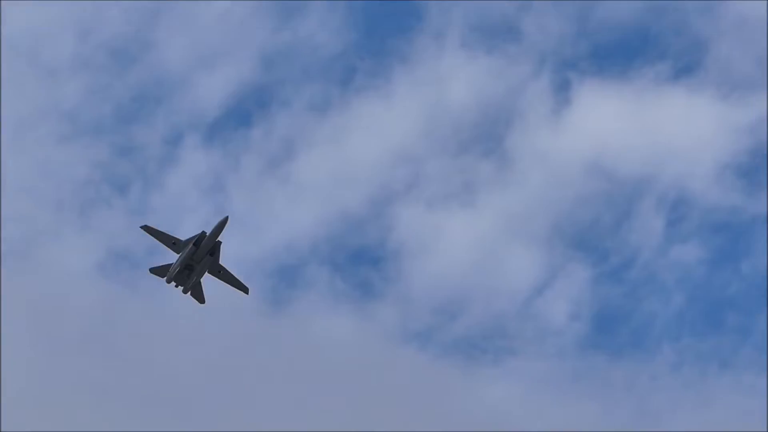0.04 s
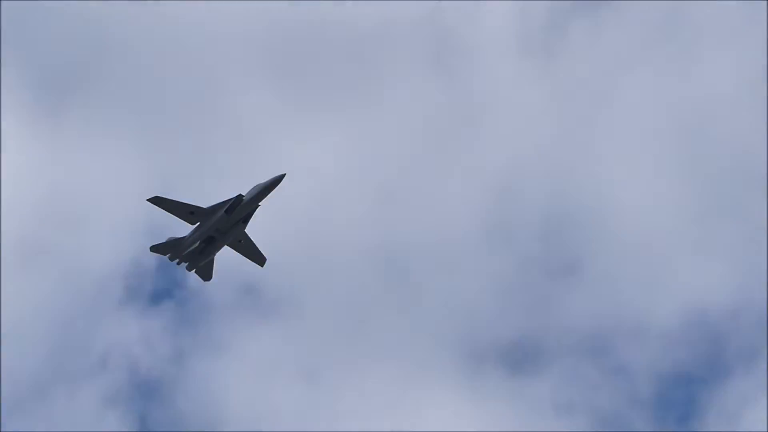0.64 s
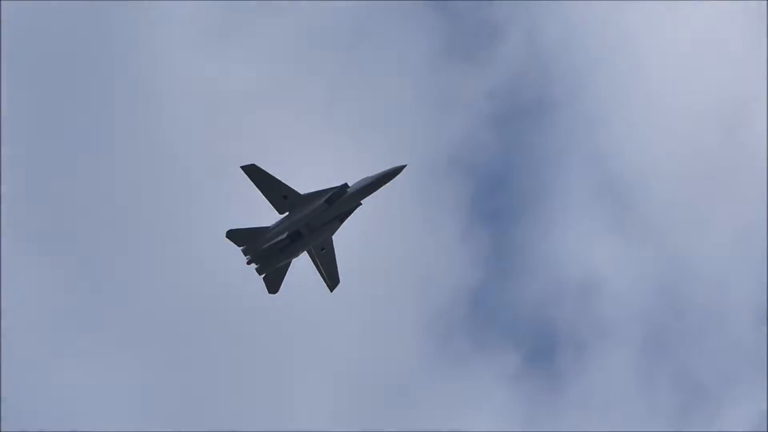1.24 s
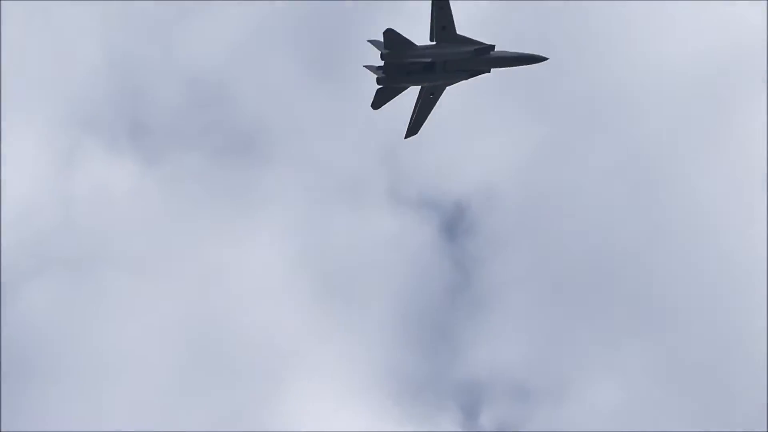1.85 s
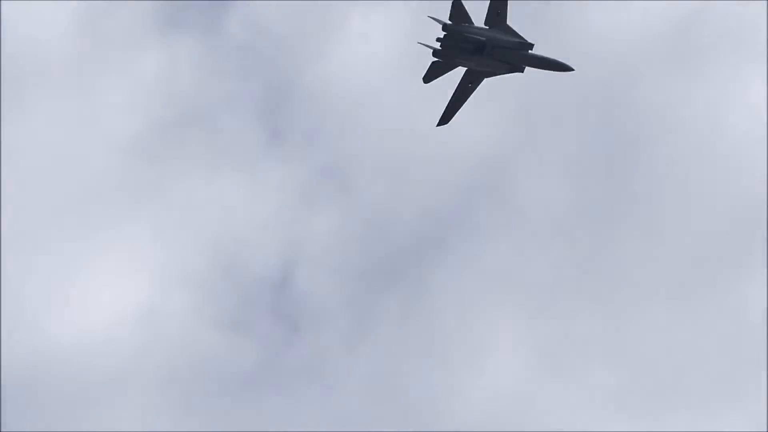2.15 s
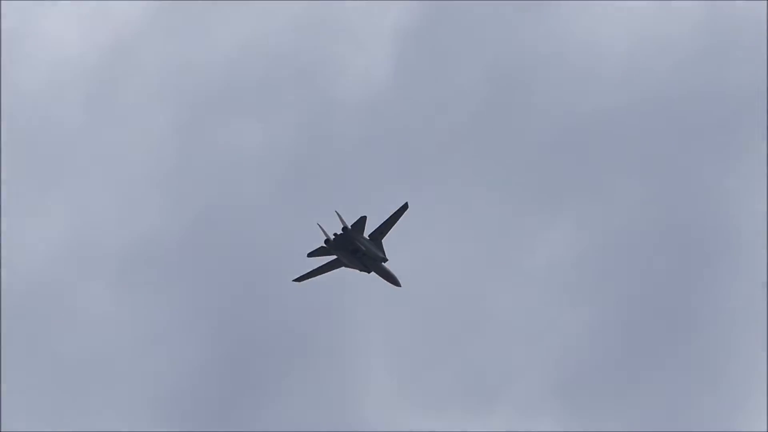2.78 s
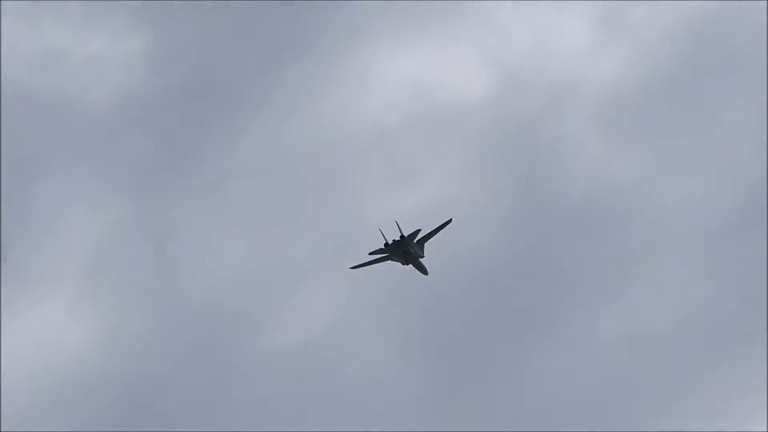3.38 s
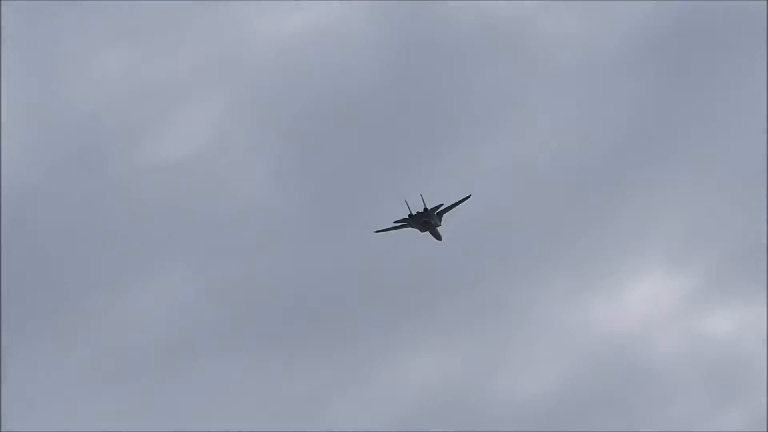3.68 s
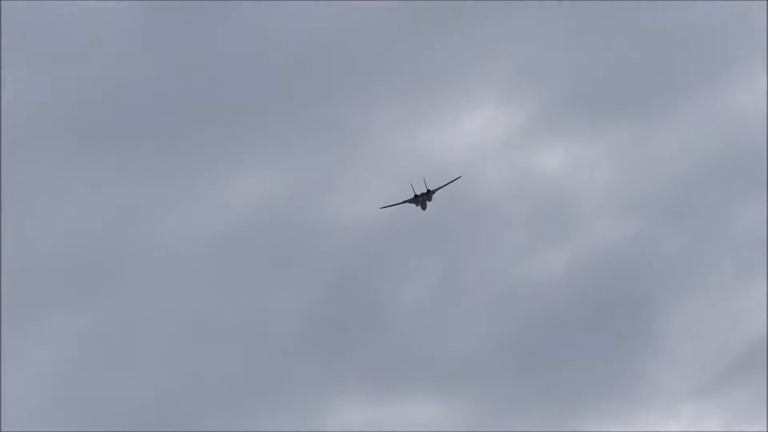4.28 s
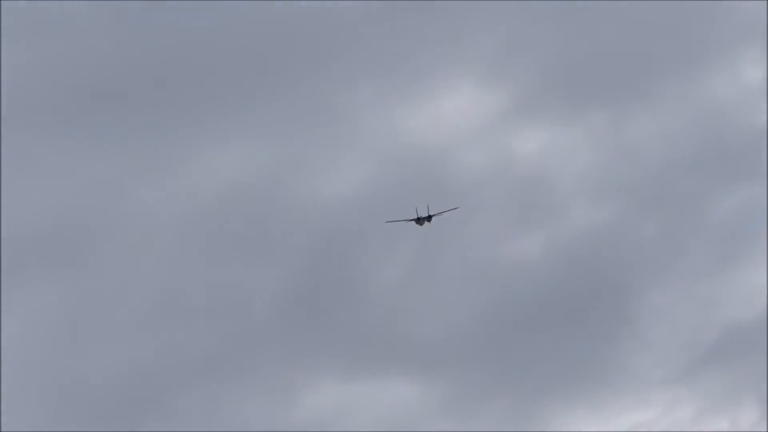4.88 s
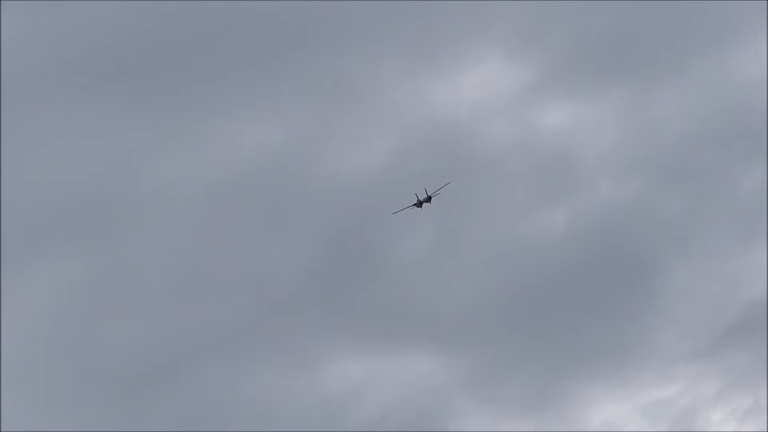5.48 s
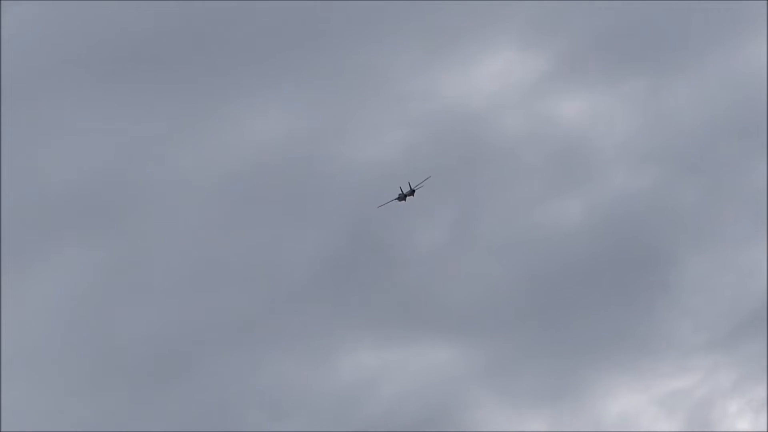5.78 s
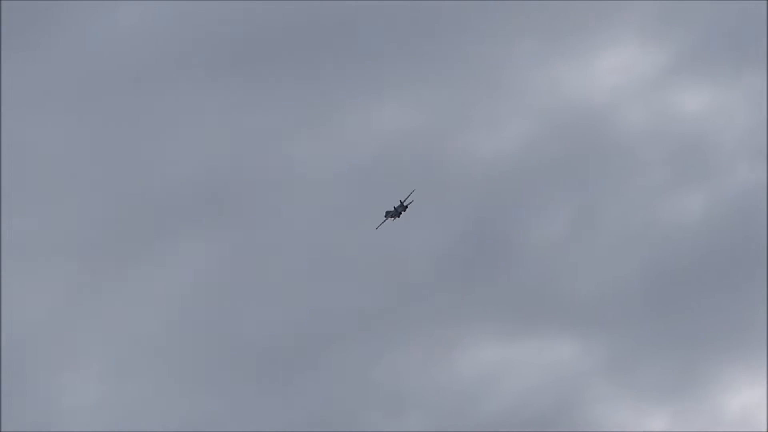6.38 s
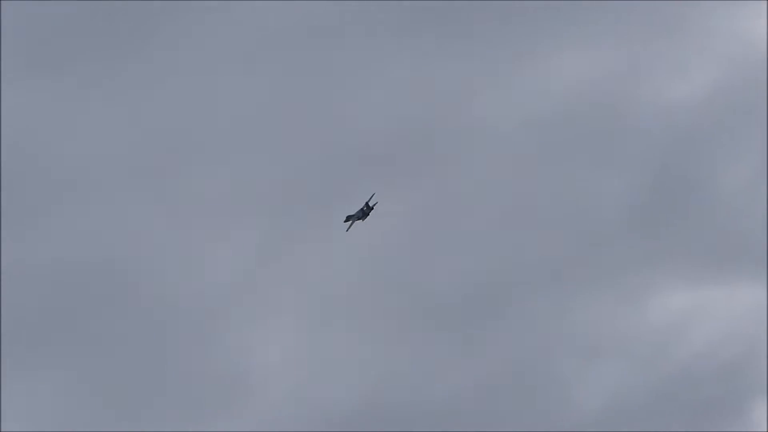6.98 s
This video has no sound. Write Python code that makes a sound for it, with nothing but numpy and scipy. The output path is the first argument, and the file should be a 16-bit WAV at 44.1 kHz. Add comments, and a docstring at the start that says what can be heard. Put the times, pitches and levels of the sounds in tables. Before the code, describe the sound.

Outdoors, wind buffets the microphone with a heavy, gusty rumble throughout. Above it, a small electric model jet approaches with a thin high whine, whistling fans, a hum and an airy rush. The pitch sinks slightly as it passes overhead. The fans then speed up in three pushes, rising in pitch while the jet flies off and grows faint, its tones wavering in the wind.

```python
"""A small electric model jet with two ducted fans approaches, while wind buffets the microphone with a
heavy rumble throughout. The motor controllers whine, the shafts hum, the blades whistle and the exhaust
rushes, all wavering in stirred air; a ground echo combs the rush and hum. At about 1.5 s the jet passes
overhead and its pitch sinks with the Doppler shift. From 1.9 to 4.1 s the throttle opens in three pushes
and the fans rise in pitch as the jet flies off toward the horizon."""
import sys
import numpy as np
from scipy import signal
from scipy.fft import rfft, irfft, next_fast_len
from scipy.io import wavfile
from scipy.ndimage import uniform_filter1d

SR = 44100
rng = np.random.default_rng(int(sys.argv[2]) if len(sys.argv) > 2 else 0)


def output_pcm(signal):
    """Save a mono or channel-first signal as 16-bit PCM at the path in sys.argv[1].

    Samples are clipped to [-1, 1] before scaling.
    """
    pcm = np.clip(np.atleast_2d(signal).T, -1, 1) * 32767
    wavfile.write(sys.argv[1], SR, np.round(pcm).astype(np.int16))


N = 319328
T = np.arange(N) / SR
PASS_S, SINKS_FROM_S = 1.55, 3.0   # jet nearest; jet starts toward the horizon
BLADES = 11

# Spectra of the wind's big and small eddies. Each row: frequency in Hz, relative density in dB.
THUMP_SPECTRUM = [(8, -9), (18, 1), (30, -1), (46, -2.5), (65, -6), (100, -14), (160, -27.5), (300, -47)]
FLUTTER_SPECTRUM = [(50, -18), (90, 2), (125, -0.5), (180, -4.5), (250, -9.5), (330, -16.5), (480, -25.5),
                    (750, -32), (1500, -45)]
# Strength of the big and small eddies. Each row: time in seconds, relative level in dB.
THUMP_DB = [(0, -14.3), (1.08, -15.0), (1.22, -19.5), (1.4, -11.8), (1.75, -16.0), (2.15, -10.3),
            (2.6, -9.8), (3.05, -11.2), (3.64, -8.2), (4.05, -15.2), (4.28, -12.2), (4.8, -13.1),
            (5.4, -15.4), (6.7, -13.2), (6.85, -18.1), (7.0, -11.3), (7.24, -15.3)]
FLUTTER_DB = [(0, -23), (0.2, -20.5), (.36, -23), (0.48, -28.5), (.56, -24), (0.95, -24.5), (1.05, -29),
              (1.18, -25.5), (1.26, -30.5), (1.45, -24.5), (1.68, -26), (1.82, -32.5), (1.92, -21.5),
              (1.96, -25.5), (2.05, -20), (2.18, -16), (2.3, -21), (2.55, -20), (2.92, -29), (3.1, -28),
              (3.58, -21), (3.66, -25.5), (4.1, -31.5), (4.17, -22), (4.55, -22), (4.8, -28), (5.1, -24),
              (5.24, -28), (5.34, -26), (6.0, -27), (6.3, -29.5), (6.5, -22), (6.66, -24), (6.8, -27.5),
              (7.24, -22.5)]
# Strikes of the heaviest eddies. Each entry: time in seconds.
BUFFETS_S = [.6, 1.07, 1.41, 1.62, 2.55, 2.86, 3.11, 3.3, 3.5, 3.62, 4.29, 4.38, 4.78, 5.12, 5.69, 6.7, 7.0]
# Small eddies that hit squarely. Each row: start in seconds, gain in dB.
PUFFS = [(.685, 5.5), (.84, 5), (.922, 4.5), (1.94, 14.5), (2.15, 3.5), (3.03, 13.5), (4.665, 9.5),
         (5.63, -5), (6.635, 3)]
# Ground echo, latest with the jet overhead. Each row: time in seconds, lag in seconds.
ECHO_LAG_S = [(0, .0058), (.5, .0075), (1.3, .0098), (1.7, .01024), (2.2, .00945), (3, .008), (3.6, .0067),
              (4.2, .00612), (5, .00597), (6, .00585), (7.24, .00578)]
# Spectra of the exhaust's three bands. Each row: frequency in Hz, relative density in dB.
ROAR_SPECTRUM = [(300, 10), (390, 7), (600, 0), (1000, 2.5), (1250, -1), (1600, -1), (2000, -7.5),
                 (2500, -10.5), (3100, -12.5), (4500, -24)]
HISS_SPECTRUM = [(1500, -1.5), (2300, 4.5), (3100, 5.5), (4000, 2.5), (5400, 2), (7000, -1.5), (8600, -0.5),
                 (9500, -9.5), (10800, -24), (13000, -17)]
SIZZLE_SPECTRUM = [(8000, 7.5), (10000, 1.5), (11000, -3.5), (12000, 2), (13700, 2), (14600, 1),
                   (15600, -16.5)]
# Exhaust strength. Each row: time in seconds, relative levels of roar and hiss in dB.
EXHAUST_DB = [(0, -35, -46), (.46, -37, -48.5), (.55, -33, -45.5), (.7, -36.5, -47.5), (1.1, -35.5, -44.5),
              (1.38, -35.5, -44), (1.62, -35, -44.5), (2.14, -42, -46.5), (2.26, -46, -52),
              (2.38, -46, -51.5), (2.46, -40, -48), (2.545, -41, -47.5), (2.575, -48, -53),
              (2.65, -43.5, -51), (2.73, -45, -58), (2.77, -40.5, -48.5), (2.88, -46, -52.5),
              (3.48, -43, -52), (3.6, -48, -55), (3.67, -58, -61.5), (3.8, -51.5, -59), (3.88, -47.5, -54),
              (4.05, -48, -57), (4.3, -50, -55.5), (4.9, -52.5, -61), (5.13, -51, -58), (5.26, -49.5, -62),
              (5.4, -48.5, -63.5), (5.82, -49.5, -58.5), (6.02, -47, -62), (6.48, -44, -53.5),
              (6.62, -45.5, -56.5), (6.8, -45.5, -57), (6.94, -44.5, -52), (7.08, -46, -56.5),
              (7.24, -43, -59)]
# Sizzle's offset from the hiss curve. Each row: time in seconds, offset in dB.
SIZZLE_TILT_DB = [(0, -13.5), (1.5, -15.5), (2.5, -11), (3.1, -9.5), (4.3, -13.5), (5.3, -14.5),
                  (7.24, -17.5)]
# Duct resonance. Each row: time in seconds, centre in Hz, relative level in dB.
DUCT_RESONANCE = [(0, 1893, -53), (.5, 1766, -45.5), (1.2, 1584, -44), (1.72, 1433, -47.5),
                  (2.05, 1320, -49), (2.4, 1282, -76.5), (7.24, 1320, -81)]
# Air catching an edge. Each row: peak time in seconds, pitch in Hz, half length in seconds, level in dB.
EDGE_TONES = [(0.57, 2400, .035, -44), (1.746, 1446, .065, -48)]
# Throttle. Each row: time in seconds, blade-passing rate in Hz before the Doppler shift.
THROTTLE_HZ = [(0, 4893), (1.9, 4885), (2.0, 5110), (2.13, 5200), (2.37, 5205), (2.68, 5425), (3.27, 5465),
               (3.5, 5680), (3.8, 6200), (4.08, 6430), (4.6, 6430), (5.05, 6360), (5.35, 6490),
               (5.78, 6385), (6.17, 6480), (6.56, 6250), (6.9, 6400), (7.24, 6260)]
# Second fan's speed over the first. Each row: time in seconds, lead as a fraction.
TWIN_LEAD = [(1.88, 0), (2.15, .025), (3.35, .039), (4.15, .009), (4.65, .03), (5.3, -.006), (5.8, .01),
             (6.15, -.006), (6.55, .026), (6.9, .004), (7.24, .028)]
# Shaft tones. Each row: time in seconds, relative levels of hum, octave and buzz in dB.
SHAFT_DB = [(0, -45, -60, -70), (.2, -46.5, -54, -61), (.4, -40.5, -58, -55), (.55, -41, -44, -56),
            (.76, -38.5, -58, -63), (.88, -37, -53.5, -55), (1.5, -34, -55, -62), (1.9, -41.5, -57, -65),
            (2.05, -52, -51, -62), (2.3, -49.5, -65, -75), (2.8, -52, -58, -83), (3.05, -52.5, -83, -77),
            (3.45, -55, -68, -80), (4.08, -57, -61.5, -77), (4.25, -52, -71, -74), (4.85, -66, -71.5, -79),
            (5.4, -65, -65, -74), (5.62, -53.5, -79, -74.5), (6.0, -61.5, -61, -73.5),
            (6.3, -55, -81, -64.5), (6.6, -53, -76, -76), (7.24, -56, -67, -70)]
# Buzz harmonics. Each row: multiple of the shaft rate, gain from ahead in dB, gain from behind in dB.
BUZZ_ORDERS = [(3, 2.5, 2), (4, -0.5, 2), (5, -7, -9), (6, -15, -10), (10, -14, -18)]
# Blade whistle. Each row: time in seconds, relative level in dB.
WHISTLE_DB = [(0, -70), (.25, -54.5), (.47, -72), (.55, -57), (.7, -64), (.83, -63), (1.1, -64),
              (1.19, -58), (1.33, -51), (1.42, -55.5), (1.52, -66), (1.72, -55), (1.92, -65), (2.06, -51),
              (2.25, -71), (2.38, -72), (2.5, -64), (2.8, -57.5), (3.2, -58), (3.45, -63), (3.6, -60),
              (3.78, -83), (3.9, -66), (4.28, -66), (4.42, -68), (4.62, -69), (4.75, -62), (5.12, -63),
              (5.35, -72), (5.6, -64.5), (5.72, -78), (6.0, -77), (6.1, -65), (6.25, -61), (6.35, -62),
              (6.48, -59), (6.62, -71), (6.85, -62), (7.08, -72), (7.24, -58)]
# Its octave, flaring side-on. Each row: time in seconds, relative levels of first and second fan in dB.
OCTAVE_DB = [(0, -67, -85), (.78, -66, -85), (.95, -62, -80), (1.15, -60.5, -80), (1.3, -68, -80),
             (1.62, -53.5, -72), (1.85, -55, -68), (2.0, -58, -62), (2.25, -66, -72), (2.5, -62, -68),
             (2.7, -74, -76), (3.4, -80, -71), (3.72, -77, -76), (3.95, -66, -69), (4.2, -82, -78),
             (4.5, -71, -70), (4.8, -83, -87), (5.1, -81, -88), (5.4, -86, -91), (5.8, -82, -82),
             (6.15, -88, -86), (6.45, -78, -81), (6.9, -83, -72), (7.24, -81, -78)]
# Doppler-shifted switching whine. Each row: time in seconds, pitch in Hz.
WHINE_HZ = [(0.0, 8310.1), (0.2, 8264.1), (0.5, 8244.7), (1.08, 8152.8), (1.84, 7944.4), (2.36, 7836.2),
            (3.16, 7765.8), (3.46, 7768.3), (3.74, 7754.2), (4.42, 7740.0), (4.98, 7753.4), (6.24, 7798.6),
            (7.24, 7861.2)]
# Whine as the ducts turn toward and away. Each row: time in seconds, relative level in dB.
WHINE_DB = [(0.05, -38), (0.15, -45), (0.33, -45), (0.41, -49), (0.53, -33.5), (0.62, -36.5), (0.89, -37.5),
            (0.93, -45.5), (1.07, -41.5), (1.18, -55), (1.24, -55), (1.3, -39.5), (1.62, -39.5),
            (1.68, -51), (1.82, -36), (2.0, -48.5), (2.16, -42), (2.2, -58), (2.44, -47), (2.56, -53),
            (2.9, -43.5), (3.35, -49), (3.61, -62), (4.07, -51), (4.17, -62), (4.27, -51.5), (4.39, -62),
            (4.67, -55), (4.85, -69), (5.11, -52.5), (5.6, -69), (5.78, -49.5), (6.06, -71), (6.44, -49),
            (6.92, -61.5), (7.06, -54), (7.12, -78), (7.2, -65)]
# Nulls as a duct's beam swings past. Each row: time in seconds, depth in dB.
WHINE_NULLS = [(.65, 12), (2.57, 11), (6.2, 12), (6.57, 15)]


def from_db(db):
    """Decibels to gain."""
    return 10 ** (np.asarray(db) / 20)


def rms_one(x):
    """Scale to unit power."""
    return x / np.sqrt(np.mean(x ** 2) + 1e-20)


def in_time(rows):
    """Linear interpolation over time; one array per value column."""
    times_s, *columns = np.transpose(rows)
    return [np.interp(T, times_s, column) for column in columns]


def bell(at_s, half_s):
    """Smooth swell of height 1."""
    return np.exp(-((T - at_s) / half_s) ** 2)


def lowpass(hz, order=2):
    """Butterworth low-pass sections."""
    return signal.butter(order, hz, fs=SR, output="sos")


def drift(rate_hz, hop=40):
    """Slow random wander of unit spread."""
    pole = np.exp(-2 * np.pi * hop * rate_hz / SR)
    white = rng.standard_normal(N // hop + 2002)
    slow = signal.lfilter([1], [1, -2 * pole, pole * pole], white)[2000:]
    return np.interp(np.arange(N) / hop, np.arange(len(slow)), rms_one(slow))


def turbulence(spectrum, skirt_db_per_octave=18):
    """Unit-power noise with the given spectrum, rolled off past its ends."""
    hz, db = np.transpose(spectrum)
    size = next_fast_len(N)
    bins_hz = np.maximum(np.arange(size // 2 + 1) * SR / size, 1)
    octaves_out = np.abs(np.log2(bins_hz / np.clip(bins_hz, hz[0], hz[-1])))
    gain = from_db(np.interp(np.log(bins_hz), np.log(hz), db) - skirt_db_per_octave * octaves_out)
    return rms_one(irfft(rfft(rng.standard_normal(size)) * gain, size)[:N])


def noise_around(hz, half_width_hz):
    """Unit-power noise band on a moving centre."""
    eddies = rms_one(signal.sosfilt(lowpass(half_width_hz), rng.standard_normal((2, N))))
    phase = 2 * np.pi * np.cumsum(hz) / SR
    return eddies[0] * np.sin(phase) + eddies[1] * np.cos(phase)


def turning(hz, wobble, wobble_hz):
    """Phase of a rotation with smoothed, slightly trembling speed."""
    speed_hz = uniform_filter1d(hz, SR // 20) * (1 + wobble * drift(wobble_hz))
    return 2 * np.pi * (np.cumsum(speed_hz) / SR + rng.random())


def tone(phase, rms_db, flicker_db):
    """A sine flickering on its way through stirred air."""
    return np.sqrt(2) * from_db(rms_db + flicker_db * drift(17)) * np.sin(phase)


def puffs_db(rise_s=.008, fall_s=.054):
    """Flutter gain from direct hits: each sets in fast and dies away."""
    return sum(db * np.clip((T - s) / rise_s, 0, 1) * np.exp(-np.maximum(T - s - rise_s, 0) / fall_s)
               for s, db in PUFFS)


def wind(split_hz=170, puff_hz=450, buffet_db=4.5, swing_at_s=1.96, swing_s=.19):
    """Big eddies thump on the microphone; small ones flutter, duller once it swings after the jet."""
    (thump_db,), (flutter_db,) = in_time(THUMP_DB), in_time(FLUTTER_DB)
    big, small = turbulence(THUMP_SPECTRUM), turbulence(FLUTTER_SPECTRUM)
    # level the noise so the gusts alone set its strength
    big /= np.sqrt(uniform_filter1d(big ** 2, size=SR // 7))
    small /= np.sqrt(uniform_filter1d(small ** 2, size=SR // 10))
    coarse = signal.sosfiltfilt(lowpass(split_hz), small)
    fine = small - coarse
    fine += (from_db(puffs_db()) - 1) * signal.sosfiltfilt(lowpass(puff_hz), fine)
    swung = .5 + .5 * np.tanh((T - swing_at_s) / swing_s)
    flutter = coarse + from_db(3.5 - 7.5 * swung) * fine
    strikes = sum(bell(s, half_s=.013) for s in BUFFETS_S)
    thump_db += buffet_db * strikes + drift(47) - .98
    flutter_db += 1.5 * drift(27) - 1.07
    return from_db(thump_db) * big + from_db(flutter_db) * flutter


def over_ground(direct, grass_hz=7500, high_gain=.23, low_gain=.48, sink_s=.7):
    """A dull echo off the grass combs the sound, more strongly as the jet gets lower."""
    lag_s, = in_time(ECHO_LAG_S)
    height = np.exp(-np.maximum(T - SINKS_FROM_S, 0) / sink_s)
    gain = low_gain + height * (high_gain - low_gain)
    dull = signal.sosfilt(lowpass(grass_hz, order=1), direct)
    return direct + gain * np.interp(T - lag_s, T, dull)


def exhaust_levels():
    """Roar, hiss and sizzle curves in dB."""
    (roar_db, hiss_db), (tilt_db,) = in_time(EXHAUST_DB), in_time(SIZZLE_TILT_DB)
    return roar_db, hiss_db, hiss_db + tilt_db


def exhaust():
    """Jet mixing noise; stirred air makes its treble swell and fade as one."""
    roar_db, hiss_db, sizzle_db = exhaust_levels()
    twinkle = from_db(.75 * drift(13))
    churn_db = .8 * drift(12)
    hiss = from_db(hiss_db - 1) * turbulence(HISS_SPECTRUM)
    sizzle = from_db(sizzle_db + 5.5 + 1.3 * drift(14)) * turbulence(SIZZLE_SPECTRUM)
    roar = from_db(roar_db - 3.5 + churn_db) * turbulence(ROAR_SPECTRUM)
    return roar + twinkle * (hiss + sizzle)


def duct_rush(trim_db=-2.1):
    """Air rushing through the ducts stirs a broad, hollow resonance."""
    hz, db = in_time(DUCT_RESONANCE)
    swell_db = 2.2 * drift(16)
    return from_db(db + trim_db + swell_db) * noise_around(hz, half_width_hz=215)


def blade_wash(blade_hz, trim_db=-9, ahead_gain=.28, far_db=.5):
    """Eddies chopped by the blades: a noise band that follows the hiss and beams aft."""
    _, hiss_db, _ = exhaust_levels()
    beam = np.clip(T / PASS_S - .8, ahead_gain, 1)
    far = np.clip(T - SINKS_FROM_S - .5, 0, 1)
    band = noise_around(.95 * blade_hz, half_width_hz=340)
    return beam * from_db(hiss_db + trim_db + far_db * far) * band


def edge_tones(sag_per_s=.3):
    """Air catches an airframe edge: brief breathy whistles, sinking in pitch."""
    whistles = np.zeros(N)
    for at_s, hz, half_s, db in EDGE_TONES:
        sinking_hz = hz * (1 - sag_per_s * np.tanh(T - at_s))
        whistles += from_db(db) * bell(at_s, half_s) * noise_around(sinking_hz, half_width_hz=20)
    return whistles


def blade_rates(switching_hz=8000):
    """Heard blade-passing rates of both fans: throttle times Doppler shift."""
    (throttle_hz,), (whine_hz,), (lead,) = in_time(THROTTLE_HZ), in_time(WHINE_HZ), in_time(TWIN_LEAD)
    doppler = whine_hz / switching_hz
    first_hz = throttle_hz * doppler
    return first_hz, first_hz * (1 + lead)


def shaft_drone(blade_hz, behind):
    """Imbalance hums once a turn, with a buzz of harmonics that differs fore and aft."""
    hum_db, octave_db, buzz_db = in_time(SHAFT_DB)
    shaft = turning(blade_hz / BLADES, wobble=.0012, wobble_hz=49)
    hum = tone(shaft, hum_db + .8, flicker_db=1.5) + tone(2 * shaft, octave_db, flicker_db=2)
    buzz = sum(tone(k * shaft, buzz_db + fore_db + behind * (aft_db - fore_db), flicker_db=2.5)
               for k, fore_db, aft_db in BUZZ_ORDERS)
    return hum + buzz


def blade_whistle(blade_hz, levels_db, airy_db=-7):
    """One fan's blade-passing harmonics, blurred by the air it swallows."""
    phase = turning(blade_hz, wobble=.0006, wobble_hz=25)
    harmonics = sum(tone(k * phase, db, flicker_db=2 + k / 2) for k, db in enumerate(levels_db, 1))
    return harmonics + from_db(levels_db[0] + airy_db) * noise_around(blade_hz, half_width_hz=55)


def fan_whistles(first_hz, second_hz, fade_db_per_s=40):
    """After the pass the first fan's forward-beamed third harmonic fades; the second fan comes out."""
    (whistle_db,), (octave_db, twin_octave_db) = in_time(WHISTLE_DB), in_time(OCTAVE_DB)
    _, _, sizzle_db = exhaust_levels()   # same path through the air as the third harmonic
    third_db = sizzle_db - 9 - fade_db_per_s * np.maximum(T - PASS_S, 0)
    hidden = np.clip(2 - T / PASS_S, 0, 1)
    first = blade_whistle(first_hz, [whistle_db - .8, octave_db + .5, third_db])
    second = blade_whistle(second_hz, [whistle_db - 7 - 15 * hidden, twin_octave_db + .5])
    return first + second


def controller_whine(blade_hz, trim_db=.5, sideband_db=-32):
    """The controllers' switching tone fades in and out in moving air; each shaft turn modulates it."""
    (hz,), (db,) = in_time(WHINE_HZ), in_time(WHINE_DB)
    shaft = turning(blade_hz / BLADES, wobble=.001, wobble_hz=15)
    loss_db = .5 * drift(10) + sum(depth_db * bell(s, half_s=.011) for s, depth_db in WHINE_NULLS)
    switching = turning(hz, wobble=.00036, wobble_hz=34)
    carrier = tone(switching, db + trim_db - loss_db, flicker_db=2.27)
    return carrier * (1 + 2 * from_db(sideband_db) * np.sin(shaft))


def scene():
    """Jet and wind, mono; the second fan's drone is heard only from behind."""
    first_hz, second_hz = blade_rates()
    whistles = fan_whistles(first_hz, second_hz) + edge_tones()
    rush = exhaust() + duct_rush() + blade_wash(second_hz)
    behind = np.clip(T / PASS_S - 1, 0, 1)
    drone = shaft_drone(first_hz, behind) + behind * from_db(-10) * shaft_drone(second_hz, behind)
    jet = controller_whine(first_hz) + whistles + over_ground(rush + drone)
    return (jet + wind())[None]


def record(dry, ceiling=.97, cutoff_hz=15550):
    """Soft clipping rounds the strongest thumps; a steep low-pass cuts the top."""
    rounded = ceiling * np.tanh(dry / ceiling)
    return signal.sosfilt(signal.ellip(10, .1, 80, cutoff_hz, fs=SR, output="sos"), rounded)


dry = scene()
out = record(dry)
output_pcm(out)
```